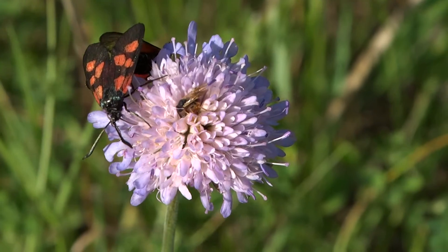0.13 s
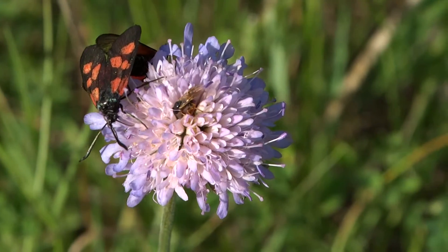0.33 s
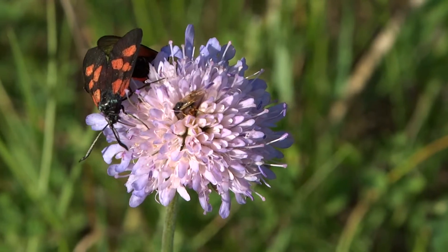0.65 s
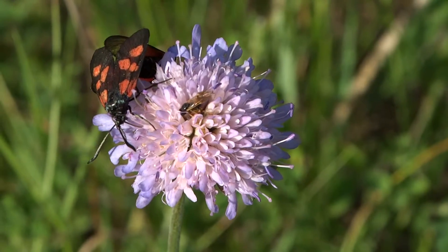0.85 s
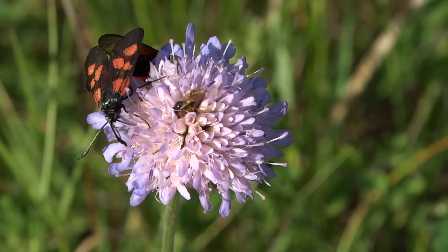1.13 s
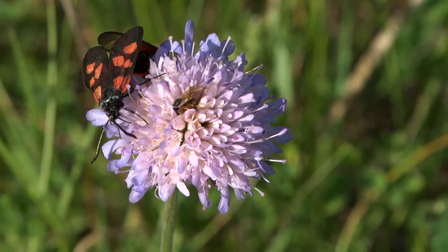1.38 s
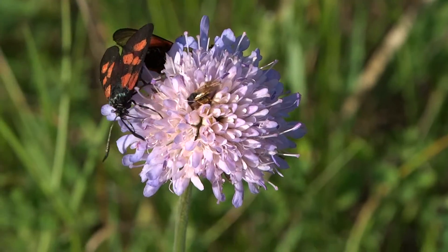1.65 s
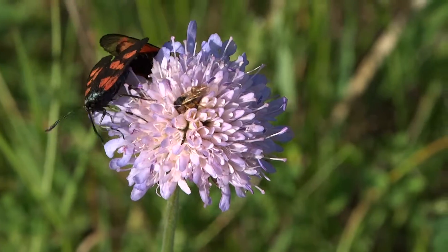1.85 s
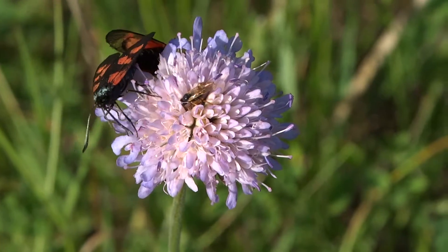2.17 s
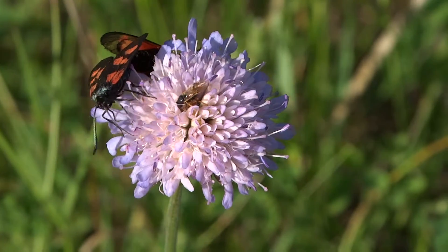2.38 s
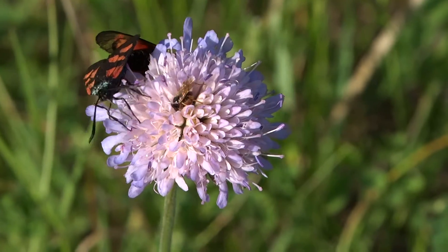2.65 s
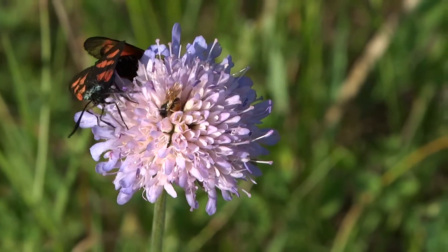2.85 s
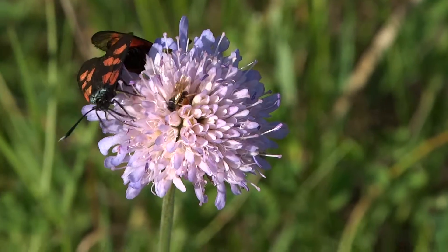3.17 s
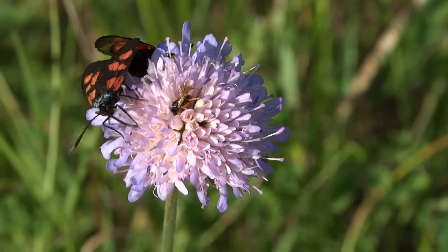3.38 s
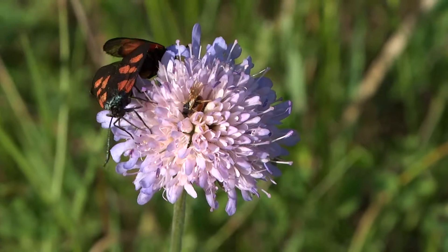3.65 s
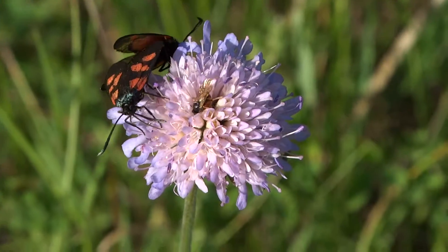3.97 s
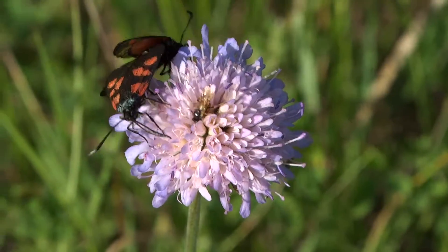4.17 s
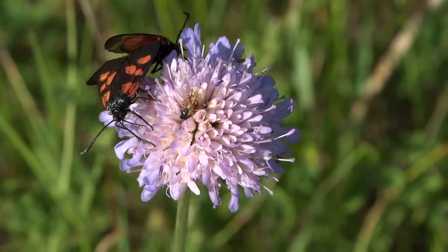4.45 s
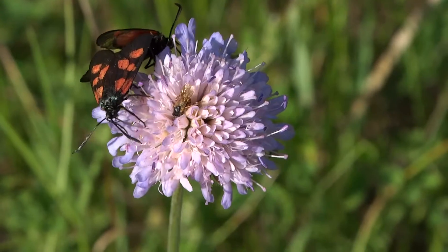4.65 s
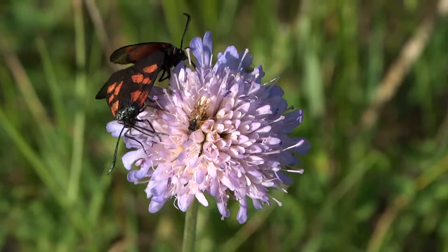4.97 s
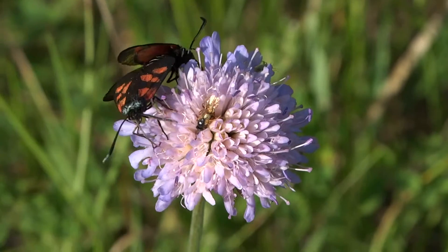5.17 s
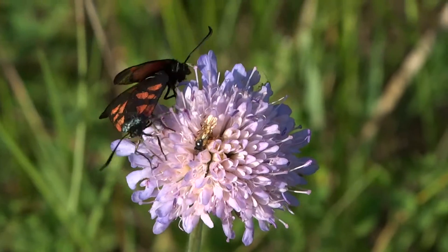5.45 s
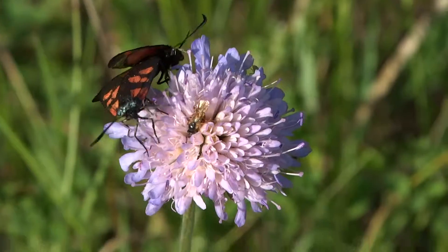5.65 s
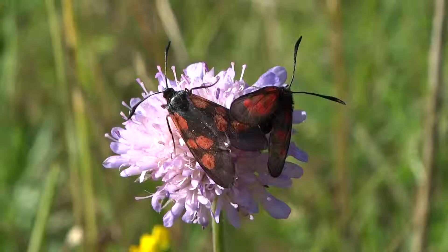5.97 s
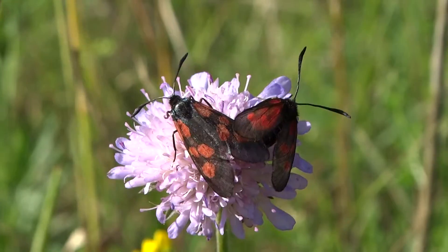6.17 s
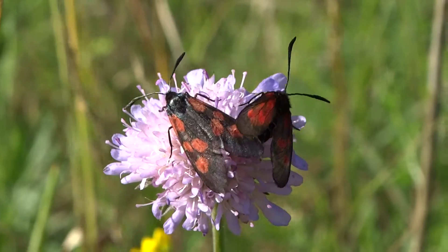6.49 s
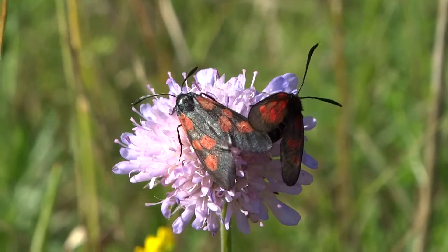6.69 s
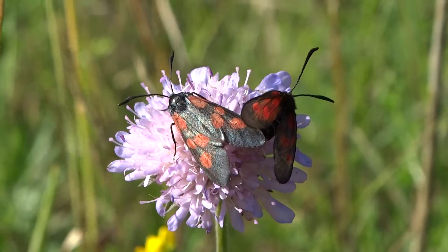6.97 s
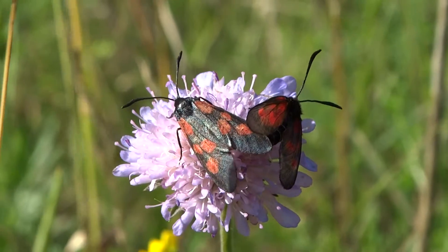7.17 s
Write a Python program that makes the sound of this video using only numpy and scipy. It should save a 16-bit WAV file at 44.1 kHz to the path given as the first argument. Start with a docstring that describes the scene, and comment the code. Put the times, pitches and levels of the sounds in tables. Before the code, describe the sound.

Grasshoppers hiss steadily in a meadow, one rasping close by, with faint bird calls, a few handling ticks and one sharp click.

```python
"""Grasshoppers in a summer meadow: the field hisses all round, and one close to the microphones files
its legs over its wings about eight times a second. A small bird calls thinly, a far road hums, and
the plastic body of the hand-held camera ticks and gives one sharp click. At six seconds the sound
fades out and comes back at a second spot, with more breeze in the grass and duller insects."""
import sys
import numpy as np
from scipy import signal
from scipy.fft import rfft, irfft, next_fast_len
from scipy.io import wavfile
from scipy.ndimage import map_coordinates

SR = 44100
rng = np.random.default_rng(int(sys.argv[2]) if len(sys.argv) > 2 else 0)


def wav_out(sig):
    """Save sig, one row per channel (or a flat mono array), as 16-bit PCM at SR to the path in sys.argv[1]."""
    wavfile.write(sys.argv[1], SR, np.round(np.clip(np.atleast_2d(sig).T, -1, 1) * 32767).astype(np.int16))


N = 323253
TIME = np.arange(N) / SR


def from_db(db):
    """Decibels to gain."""
    return 10 ** (np.asarray(db) / 20)


def unit_rms(x):
    """Scale to unit power."""
    return x / np.sqrt(np.mean(x ** 2) + 1e-20)


def drift(per_s):
    """A smooth random wander of spread 1 that changes about per_s times a second."""
    knots = rng.standard_normal(N // 10)
    return unit_rms(map_coordinates(knots, [TIME * per_s], order=2, mode="wrap"))


def swells(rows):
    """Summed power of bell-shaped swells: (peak time [s], half length [s], level [dB])."""
    return sum(from_db(db) ** 2 * np.exp(-np.minimum(((TIME - s) / half_s) ** 2, 40))
               for s, half_s, db in rows)


def at_hz(points, hz):
    """Read a curve on a log-frequency axis."""
    points_hz, values = np.transpose(points)
    return np.interp(np.log(np.maximum(hz, 1)), np.log(points_hz), values)


def resonate(x, hz, width_hz):
    """A resonance with gain 1 at its peak."""
    r = np.exp(-np.pi * width_hz / SR)
    poles = [1, -2 * r * np.cos(2 * np.pi * hz / SR), r * r]
    return signal.lfilter(np.array([1, 0, -1]) * (1 - r * r) / 2, poles, x)


def band(x, low_hz, high_hz):
    """Band-pass with gentle skirts."""
    return signal.sosfilt(signal.butter(2, [low_hz, high_hz], "band", fs=SR, output="sos"), x)


def stereo_noise(colour):
    """Unit-power noise at the microphone pair, diffuse in the bass and alike in the treble."""
    # likeness of the two microphones: (frequency [Hz], correlation [0..1])
    likeness = [(60, 0), (150, 0.34), (300, 0.54), (500, 0.62), (800, 0.6), (1300, 0.8), (2000, .93),
                (3300, .97), (5500, 1), (8000, 1), (10200, 0.87), (12500, 0.79), (15000, 1)]
    size = next_fast_len(N)
    hz = np.fft.rfftfreq(size, 1 / SR)
    mid, side = rfft(rng.standard_normal((2, size))) * from_db(at_hz(colour, hz))
    alike = at_hz(likeness, hz)
    mid, side = mid * np.sqrt(1 + alike), side * np.sqrt(1 - alike)
    return unit_rms(irfft([mid + side, mid - side], size)[:, :N])


def chorus(colour, flutter_db, pulse_db):
    """Many distant singers merge into a hiss that still flutters with their pegs and strokes."""
    return unit_rms(stereo_noise(colour) * from_db(flutter_db * drift(600) + pulse_db * drift(30)))


def grasshopper_field(trim_db=-0.11):
    """The chorus heard from among the singers, gently rising and falling."""
    # loudness of the field: (time [s], level before trim [dB])
    loudness = [(0.0, -50), (1.22, -48), (2.1, -49), (2.84, -50.7), (3.33, -49), (5.7, -50)]
    # spectrum of its hiss: (frequency [Hz], relative level [dB])
    colour = [(3500, -38.5), (4700, -14), (5800, -8.5), (6500, -2.5), (7150, 0), (7900, -2), (8400, -2),
              (9400, -7.5), (10400, -14), (11300, -21), (12400, -18.5), (14000, -25), (16500, -29)]
    level_db = np.interp(TIME, *np.transpose(loudness)) + trim_db
    return from_db(level_db) * chorus(colour, flutter_db=1.1, pulse_db=0.9)


def still_air(level_db=-58):
    """Faint, steady air in the grass."""
    # its spectrum: (frequency [Hz], relative level [dB])
    colour = [(20, -34), (150, -38), (300, -27.5), (480, -22.5), (700, -17), (1050, -11.5), (1480, -7),
              (1800, -7), (2500, -3.5), (3200, 0), (4000, -2.5), (4700, -6), (6500, -8.5), (12000, -32)]
    return from_db(level_db) * stereo_noise(colour)


def far_road(steady_db=-91):
    """A faint hum from far off that swells as traffic goes by."""
    # passing traffic: (peak time [s], half length [s], level [dB])
    traffic = [(2.45, .2, -87), (3.6, 0.28, -85.5), (4.88, .3, -81.5)]
    # spectrum of the hum: (frequency [Hz], relative level [dB])
    colour = [(150, -10), (330, -6.5), (465, 8), (580, -3.5), (900, -27)]
    return np.sqrt(from_db(steady_db) ** 2 + swells(traffic)) * stereo_noise(colour)


def bright_grasshopper(steady_db=-69, trim_db=-4, rough_db=3, pulse_db=3):
    """One brighter singer holds a thin, rough, unsteady trill above the field."""
    # long swells and short bursts: (peak time [s], half length [s], level before trim [dB])
    surges = [(.77, 0.023, -59), (1.215, 0.018, -58), (1.4, 0.76, -59.5), (3.46, 0.012, -55),
              (4.51, .02, -59), (5.42, .02, -57), (5.65, 0.48, -56)]
    # spectrum of the trill: (frequency [Hz], relative level [dB])
    colour = [(7000, -19.5), (9500, -1), (11000, 2), (12200, 0), (13500, -4.5), (16500, -6)]
    level = np.sqrt(from_db(steady_db) ** 2 + swells(surges))
    trill = stereo_noise(colour) * from_db(rough_db * drift(270) + pulse_db * drift(29))
    return from_db(trim_db) * level * unit_rms(trill)


def rasp(pegs_per_s, jitter, decay_s, uneven_db):
    """Pegs catch the wing vein at an unsteady rate, each a tiny dying scratch of its own strength."""
    pegs_passed = np.cumsum(pegs_per_s * np.exp(jitter * drift(150))) / SR
    strength = from_db(uneven_db * (2 * rng.random(N) - 1))[pegs_passed.astype(int)]
    since_catch_s = (pegs_passed % 1) / pegs_per_s
    return strength * np.exp(-since_catch_s / decay_s) * rng.choice([-1, 1], N)


def near_grasshopper(trim_db=0.2, uneven_db=1.5, swell_s=0.026, stop_s=0.019, return_db=-10.5):
    """Close to the microphones, a leg strokes evenly in bouts and its scratches ring in the wing."""
    # wing resonances: (frequency [Hz], width [Hz], relative level [dB])
    wing_modes = [(7580, 1140, 9.5), (8390, 560, 3), (12200, 2000, -22)]
    # bouts of strokes, levels before trim:
    # (first stroke [s], last stroke [s], pace [1/s], first level [dB], last level [dB])
    bouts = [(0.045, 1.228, 7.5, -54, -50.5), (1.408, 2.318, 7.8, -48.5, -49.5),
             (2.685, 2.996, 6.5, -53, -55), (3.345, 3.913, 8.3, -53.5, -54.5),
             (4.316, 5.073, 6.7, -52.5, -52.5), (5.196, 5.948, 7.8, -55, -47.5)]
    # sharp accents: hard bites of the leg and single strokes of a second singer close by: (peak time [s], half
    # length [s], level before trim [dB])
    accents = [(.31, 0.0067, -51), (1.243, 0.0077, -51), (1.335, 0.0053, -49), (1.67, .006, -49),
               (1.805, .005, -45), (2.19, 0.0058, -47), (2.25, .014, -53), (4.69, 0.0089, -54),
               (5.05, .014, -52), (5.695, 0.011, -51)]
    scratches = rasp(pegs_per_s=290, jitter=.24, decay_s=.0017, uneven_db=3.5)
    wing = sum(from_db(db) * resonate(scratches, hz, width) for hz, width, db in wing_modes)
    effort = from_db(uneven_db * drift(45))
    power = swells(accents)
    for first_s, last_s, per_s, first_db, last_db in bouts:
        count = round((last_s - first_s) * per_s) + 1
        for s, db in np.linspace((first_s, first_db), (last_s, last_db), count):
            stroke = (s, np.where(TIME < s, swell_s, stop_s), db)
            way_back = (s + .5 / per_s, swell_s, db + return_db)
            power += swells([stroke, way_back])
    return from_db(trim_db) * effort * np.sqrt(power) * unit_rms(band(wing, 5800, 12500))


def small_singer(wing_hz=12000, width_hz=800, pulse_db=3):
    """A small insect's fast pegs ring one narrow, high wing resonance."""
    # its one verse: (peak time [s], half length [s], level [dB])
    verse = [(1.05, .45, -69.5)]
    scratches = rasp(pegs_per_s=380, jitter=.2, decay_s=.001, uneven_db=3)
    wing = band(scratches, wing_hz - width_hz / 2, wing_hz + width_hz / 2)
    return np.sqrt(swells(verse)) * unit_rms(wing * from_db(pulse_db * drift(35)))


def snap(smear_s, stages=7):
    """A unit click smeared by its path through the case: each frequency has its own short delay."""
    hz = np.linspace(1000, 12000, stages) * rng.uniform(.9, 1.1, stages)
    r = np.exp(-2 / (smear_s * SR))
    allpasses = [[r * r, tuning, 1, 1, tuning, r * r] for tuning in -2 * r * np.cos(2 * np.pi * hz / SR)]
    return signal.sosfilt(allpasses, signal.unit_impulse(SR // 5) + 1e-18)


def rattle(contact, level_db=-12, decay_s=.006, low_hz=400, high_hz=5500, size=2048):
    """Loose parts of the case chatter briefly after each contact."""
    chatter = rng.standard_normal(size) ** 3 * np.exp(-np.arange(size) / SR / decay_s)
    shaken = signal.fftconvolve(contact, chatter / np.linalg.norm(chatter))[:len(contact)]
    return from_db(level_db) * band(shaken, low_hz, high_hz)


def touch_point(contact, hz, db, q=5):
    """The point touched favours the modes near one frequency, or lies on their node and mutes them."""
    return contact + (from_db(db) - 1) * resonate(contact, hz, hz / q)


def ring(contact, modes, pitch):
    """A contact sets the case's modes ringing, all shifted by a pitch factor."""
    return sum((-1) ** k * from_db(db) * resonate(contact, hz * pitch, width)
               for k, (hz, width, db) in enumerate(modes))


def crack(contact, decay_s=.0007, low_hz=6400, high_hz=9400, size=256):
    """The crisp edge of a snap: a burst of treble that dies at once."""
    burst = rng.standard_normal(size) * np.exp(-np.arange(size) / SR / decay_s)
    return band(np.convolve(contact, burst / np.linalg.norm(burst))[:len(contact)], low_hz, high_hz)


def camera_ticks(lag_s=0.00004, bend_hz=3200, twist_db=1.2):
    """Handling noise right at the microphones: each snap cracks and rings the plastic body."""
    # contacts on the body: (time [s], strength [dB], low edge [Hz], high edge [Hz], pitch [factor],
    # touch point [Hz], touch gain [dB], smear [s], relative crack [dB], left over right [dB])
    contacts = [(1.493, -18, 950, 2800, .85, 1600, 2, .0004, 6, 1.5),
                (1.4968, -25.5, 250, 2400, .6, 1200, 2, .0006, 3, 0),
                (2.556, -29.5, 350, 2600, 0.77, 1500, 3, .002, -10, -4),
                (3.1524, -20, 60, 1300, .82, 780, -12, .0018, -14, -4),
                (3.2008, -18.5, 1550, 5200, .74, 1850, 6, .0011, 2.5, -5),
                (3.2066, -25, 1200, 6000, .92, 1600, 6, .001, 8, -7),
                (3.2218, -23, 660, 3200, 1.06, 2200, -10, .0009, -9, -8),
                (3.2378, -29, 760, 8000, 0.494, 1740, 12.5, 0.00086, 10, -3),
                (4.1429, -16, 1100, 8000, .56, 2670, 14.5, 0.0013, 3, -2),
                (4.1434, -12, 402, 580, 0.71, 750, -12, .0016, -11, -1),
                (4.1442, -15, 1100, 4800, 1.12, 3850, 3, .001, -1, -2),
                (4.147, -19, 1000, 3400, 1.08, 3000, 5, 0.00087, -14, 0),
                (4.1795, -22, 280, 4200, .7, 420, 10, 0.0024, -10, -1),
                (4.187, -21, 280, 1700, .553, 780, 3, .0011, -10, 0),
                (4.194, -24, 90, 1300, .3, 750, 1, .0039, -10, -3),
                (4.2027, -26.5, 150, 1400, .4, 750, 2, 0.0013, -10, 1),
                (5.3588, -19.5, 550, 12000, .96, 1250, 5, .0005, -1, -5),
                (5.4596, -6.5, 1750, 3350, 1.17, 3370, -19, .0005, -7, 2),
                (5.4601, -9.5, 600, 1500, .852, 980, 4, .0005, -22, 1),
                (5.5321, 1.5, 480, 14000, .99, 2100, 1.5, 0.0018, -6, -1.3)]
    # modes of the body: (frequency before pitch factor [Hz], width [Hz], gain [dB])
    body_modes = [(600, 130, -13), (745, 65, -1.5), (1000, 210, 1.5), (1102, 17, 7), (1430, 230, -2),
                  (1720, 62, 7.5), (1954, 160, 10), (2230, 220, 5.5), (2780, 95, 9.5), (3060, 180, 7),
                  (3430, 330, 9), (4000, 210, 7), (4840, 250, 2.5), (6744, 250, 14.5), (7980, 220, 7.5),
                  (8770, 530, 3), (9800, 280, 5), (10850, 520, 1.5), (12200, 420, -1.5), (13800, 1000, -8)]
    # twisting modes, which move the two microphones in opposite ways: same columns
    twist_modes = [(470, 160, -29), (760, 160, -14), (1000, 150, -9), (1480, 260, -1.5), (1810, 180, 5),
                   (2050, 180, -1), (2530, 200, 6)]
    ticks = np.zeros((2, N))
    bend_lowpass = signal.butter(3, bend_hz, fs=SR, output="sos")
    for s, db, low_hz, high_hz, pitch, touch_hz, touch_db, smear_s, crack_db, pan_db in contacts:
        contact = snap(smear_s)
        contact = touch_point(contact + rattle(contact), touch_hz, touch_db)
        body = band(ring(contact, body_modes, pitch), low_hz, high_hz)
        twist = band(ring(contact, twist_modes, pitch), low_hz, high_hz)
        mid = body + from_db(crack_db) * crack(contact)
        # slow bending waves in the case reach the left microphone a moment before the right
        bending = signal.sosfiltfilt(bend_lowpass, mid, padtype=None)
        side = lag_s / 2 * SR * np.diff(bending, prepend=0) + from_db(twist_db) * twist
        gains = from_db([[db + pan_db / 2], [db - pan_db / 2]])
        start = round(s * SR)
        ticks[:, start:start + len(mid)] += gains * [mid + side, mid - side]
    return ticks


def echo(x, delay_s, db):
    """A reflection reaches the microphones later and softer."""
    return from_db(db) * np.interp(TIME - delay_s, TIME, x, left=0)


def bird(climb_hz_per_s=14000, drop_hz_per_s=23500, end_hz=6130, climb_db=-7.5, flutter_db=3):
    """Thin fluttering whistles climb softly, drop to one low note and echo off ground and bushes."""
    # calls: (time of top note [s], top note [Hz], climb [s], level [dB])
    calls = [(3.512, 6950, .005, -55), (3.612, 7380, .04, -50), (4.275, 7260, .005, -52.5),
             (4.889, 7620, .075, -44.5)]
    song = np.zeros(N)
    waver = 1 + .007 * drift(400)
    soft = from_db(climb_db)
    for top_s, top_hz, climb_s, db in calls:
        t = TIME - top_s
        drop_s = (top_hz - end_hz) / drop_hz_per_s
        hz = np.interp(t, [-climb_s, 0, drop_s], [top_hz - climb_hz_per_s * climb_s, top_hz, end_hz])
        loudness = np.interp(t, [-climb_s, -climb_s / 2, 0, drop_s / 2, drop_s], [0, soft, soft, 1, 0])
        song += from_db(db) * loudness * np.sqrt(2) * np.sin(2 * np.pi * np.cumsum(hz * waver) / SR)
    song *= from_db(flutter_db * drift(180))
    return song + echo(song, delay_s=0.012, db=-6) + echo(song, delay_s=0.073, db=-12)


def far_grasshoppers(level_db=-52.5):
    """The chorus sounds duller with the microphones farther from the singers."""
    # its spectrum: (frequency [Hz], relative level [dB])
    colour = [(4000, -32.5), (5400, -5), (6400, 2.5), (7400, 1), (8500, -0.5), (9500, -7), (10600, -14.5),
              (12800, -26.5), (16500, -31)]
    return from_db(level_db) * chorus(colour, flutter_db=1.0, pulse_db=1.3)


def breeze(level_db=-54.5):
    """A steady breeze hisses through the grass."""
    # its spectrum: (frequency [Hz], relative level [dB])
    colour = [(20, -36), (150, -39), (300, -22.5), (500, -15.5), (1000, -6.5), (1500, -2.5), (1800, 0.5),
              (2050, -4), (2400, 0), (3300, -0.5), (4100, -1.5), (4700, 1), (7000, -4), (14000, -30.5)]
    return from_db(level_db) * stereo_noise(colour)


def scene(change_s=5.997, fade_out_s=.038, fade_in_s=.09):
    """Two microphone positions in the meadow: the first fades out quickly and the second swells in."""
    insects = grasshopper_field() + near_grasshopper() + bright_grasshopper() + small_singer()
    first_spot = insects + still_air() + far_road() + bird() + camera_ticks()
    second_spot = far_grasshoppers() + breeze()
    leaving = np.clip((change_s - TIME) / fade_out_s, 0, 1) ** 2
    arriving = 1 - np.exp(-np.maximum(TIME - change_s, 0) / fade_in_s)
    return leaving * first_spot + arriving * second_spot


def record(dry):
    """The highest treble is cut steeply."""
    cutoff_hz = 15900
    return signal.sosfilt(signal.ellip(12, .1, 80, cutoff_hz, fs=SR, output="sos"), dry)


dry = scene()
out = record(dry)
wav_out(out)
```